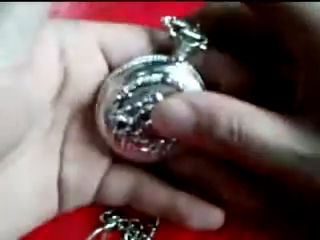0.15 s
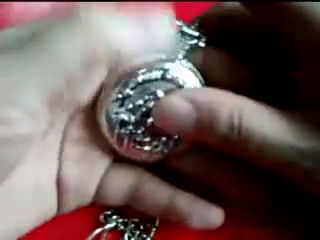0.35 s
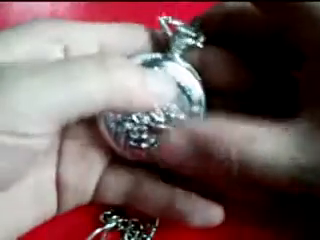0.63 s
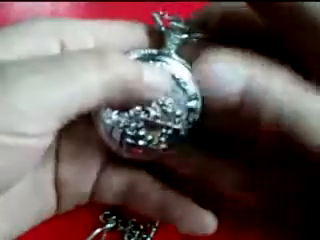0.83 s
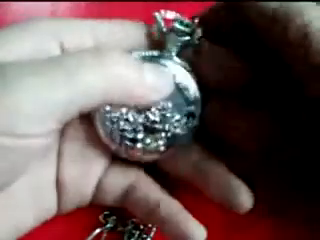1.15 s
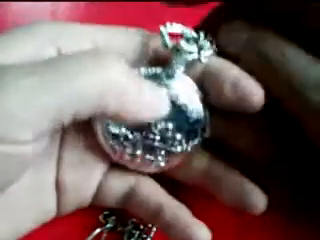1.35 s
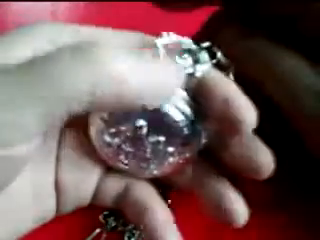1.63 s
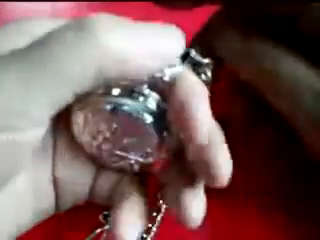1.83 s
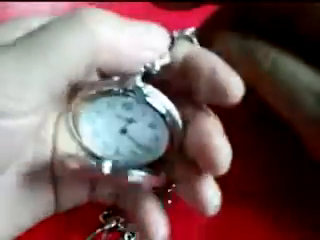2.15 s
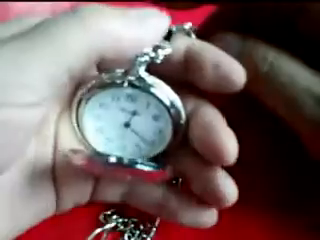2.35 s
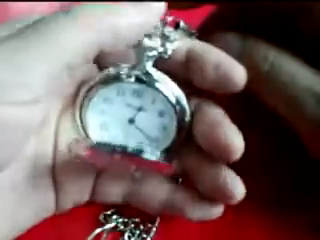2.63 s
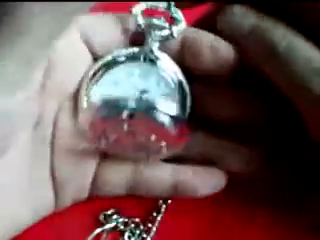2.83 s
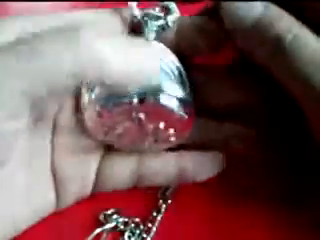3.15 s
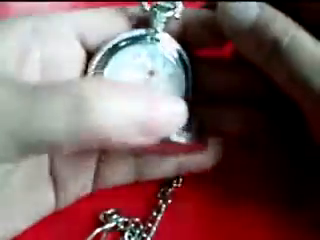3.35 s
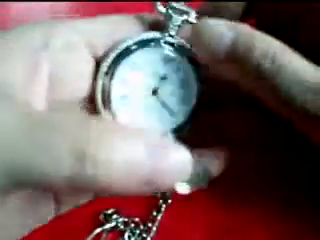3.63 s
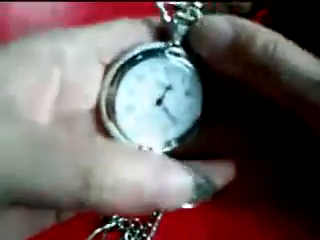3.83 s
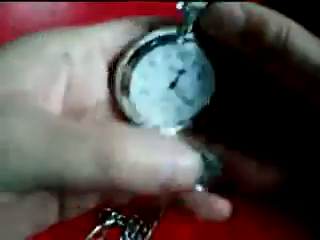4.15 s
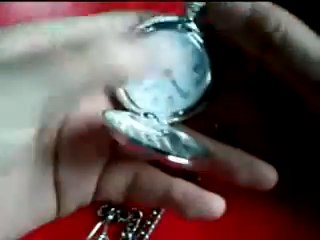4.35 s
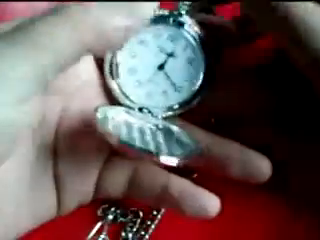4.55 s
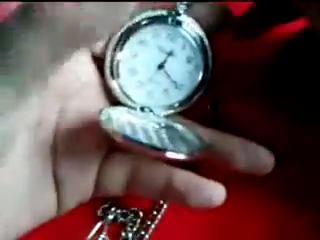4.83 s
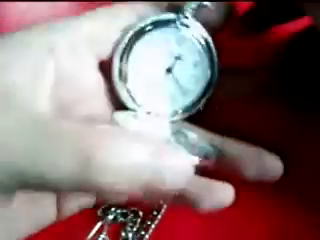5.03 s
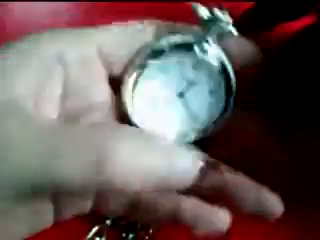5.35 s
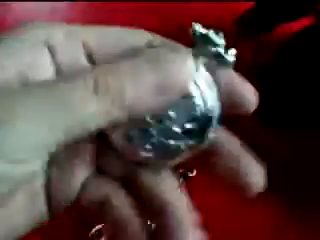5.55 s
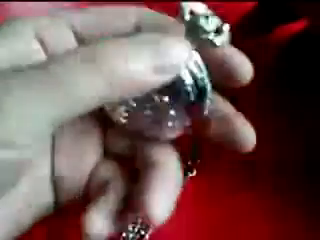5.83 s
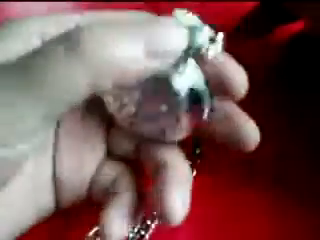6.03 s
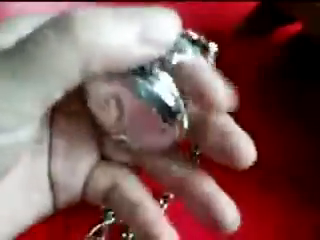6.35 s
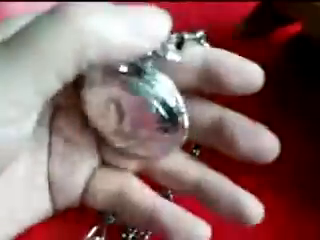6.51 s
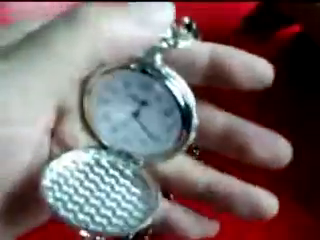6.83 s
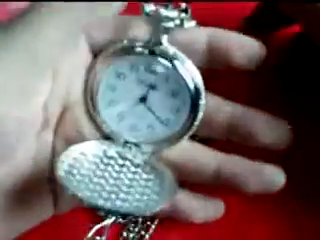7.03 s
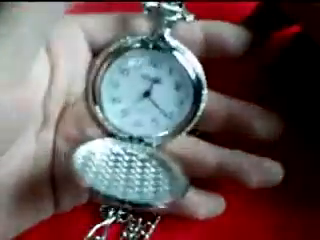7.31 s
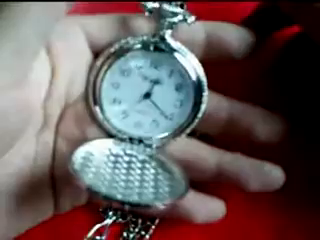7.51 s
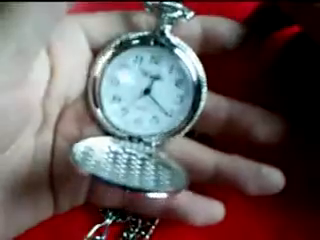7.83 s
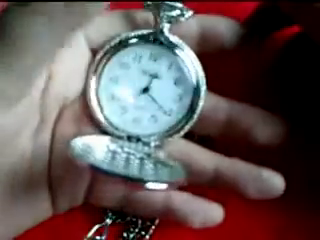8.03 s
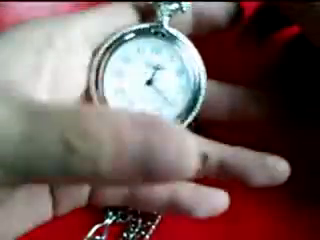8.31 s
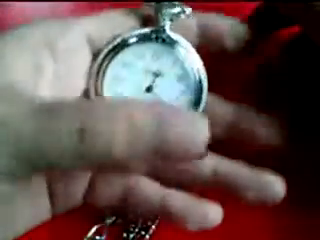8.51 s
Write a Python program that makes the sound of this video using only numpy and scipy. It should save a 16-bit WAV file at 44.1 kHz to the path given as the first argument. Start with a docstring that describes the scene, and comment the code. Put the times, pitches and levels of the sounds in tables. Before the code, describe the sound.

A metal pocket watch is handled very close to the microphone in a bare, ringing room, with faint steady hiss and low hum throughout. Two soft ticks come first. At about 1 second the cover snaps shut with a loud, sharp click that slightly overloads the microphone and leaves a short room tail. Light ticks and scrapes of bow and chain on the case gather around 2 seconds, then thin out. A bright clink at 3.7 seconds starts a busier run of clicks, scrapes and small chain rattles, strongest from 4.3 to 4.7. More ticks lead to a second loud snap at 5.8 seconds. A few clicks follow, and at about 6.7 the cover springs open, bouncing on its hinge in a quick, short chatter, with a thin high clink at 6.9. Sparse soft ticks come around 7.2 and from 8.3 to 8.6 seconds.

```python
"""A bare, ringing room, with a metal pocket watch handled close to the microphone.
Twice the cover is snapped shut past its catch, hard enough to overload the microphone. In between, bow and
chain tick and scrape on the case; after the second snap the open cover bounces on its hinge stop.
Each touch rings the hand-damped metal and carries into the room. Faint hiss and hum lie underneath."""
import sys
import numpy as np
from scipy import signal
from scipy.fft import rfft, irfft
from scipy.io import wavfile

SR = 44100
rng = np.random.default_rng(int(sys.argv[2]) if len(sys.argv) > 2 else 0)


def persist_wave(psi):
    """Save psi, clipped to +-1, as 16-bit WAV."""
    counts = np.round(np.clip(psi, -1, 1) * 32767).astype(np.int16)
    wavfile.write(sys.argv[1], SR, np.atleast_2d(counts).T)


N = 382347


def from_db(db):
    """Decibels to gain."""
    return 10 ** (np.asarray(db) / 20)


def rms_one(x):
    """Scale to rms 1."""
    return x / np.sqrt(np.mean(x ** 2) + 1e-20)


def at_hz(points, hz):
    """Read a curve on a log-frequency axis."""
    freqs, values = np.transpose(points)
    return np.interp(np.log(np.maximum(hz, 1)), np.log(freqs), values)


def seconds(length_s):
    """Time axis of the given length."""
    return np.arange(int(length_s * SR)) / SR


def add(out, start_s, sound):
    """Mix a sound in at start_s."""
    at = max(int(start_s * SR), 0)
    out[at:at + len(sound)] += sound[:N - at]


def coloured_noise(gain_at):
    """Noise of rms 1 whose spectrum follows a function of Hz."""
    spectrum = rfft(rng.standard_normal(N)) * gain_at(np.fft.rfftfreq(N, 1 / SR))
    return rms_one(irfft(spectrum, N))


# Colour of the microphone amplifier's hiss: frequency_hz, relative_db
HISS_COLOUR = [(15, -38), (25, -8.5), (89, -4.5), (118, -10.5), (140, -4), (184, -6), (289, -3), (514, -13),
               (694, -9.5), (1010, -9.5), (1750, -19.5), (2610, -28), (3520, -32.5), (7080, -36.5),
               (9800, -56), (12700, -93), (21600, -120)]

def hiss(level_db):
    """The amplifier's steady noise floor, strongest in the bass."""
    return from_db(level_db) * coloured_noise(lambda hz: from_db(at_hz(HISS_COLOUR, hz)))


# Hum and whines behind the watch: pitch_hz, half_width_hz, level_db
HUM_BANDS = [(55.3, 4.6, -62), (89, 6.1, -54.5), (311, 38, -57.5), (934, 41, -61.5), (1192, 8.9, -66.5),
             (1395, 6.8, -66), (1910, 12, -69), (2660, 16, -69), (2730, 470, -64.5)]

def hum():
    """Low hum and faint whines, each a narrow band of noise that wavers."""
    return sum(from_db(level_db) * coloured_noise(lambda hz: 1 / (1 + ((hz - pitch_hz) / width_hz) ** 2))
               for pitch_hz, width_hz, level_db in HUM_BANDS)


# Decay of the bare room: frequency_hz, t60_s
ROOM_DECAY = [(300, 2.5), (1100, 1.35), (2500, 1.8), (5000, 1.16), (9000, 1.2)]
# Colour of its tail at the microphone: frequency_hz, relative_db
TAIL_COLOUR = [(400, -20), (650, -4.5), (1150, 3.5), (1600, -0.5), (2100, 0.5), (3100, 0), (4000, -6),
               (5000, 2), (7000, -3.5), (10000, -0.5)]

def room(sound, wet_db, build_s):
    """In each band the room stores the sound's energy and lets it die away as diffuse noise."""
    out, white = np.zeros(N), rng.standard_normal((2, N))
    edges_hz = np.geomspace(400, 11000, 25)
    build = np.exp(-1 / (build_s * SR))
    for k, (low, high) in enumerate(zip(edges_hz, edges_hz[1:])):
        centre_hz = np.sqrt(low * high)
        band = signal.butter(3, [low, high], "band", fs=SR, output="sos")
        keep = from_db(-60 / (at_hz(ROOM_DECAY, centre_hz) * SR)) ** 2
        energy = signal.sosfilt(band, sound + 1e-9 * white[0]) ** 2
        arriving = signal.lfilter([1 - build], [1, -build], energy)
        stored = signal.lfilter([1 - keep], [1, -keep], arriving)
        noise = rms_one(signal.sosfilt(band, white[k % 2]))
        out += from_db(wet_db + at_hz(TAIL_COLOUR, centre_hz)) * np.sqrt(stored) * noise
    return out


# Modes of the watch's cover, case and rim, damped by the hand: pitch_hz, width_hz, relative_db
COVER_MODES = [(850, 150, -2), (1146, 180, 3), (1630, 170, 2)]
CASE_MODES = [(2000, 194, 3), (2453, 207, 4), (2640, 265, 4), (3320, 260, -3)]
RIM_MODES = [(3860, 185, -5.5), (4300, 360, 0.5), (4680, 1330, 2), (5600, 920, 1), (6670, 820, -6),
             (7250, 230, -9.5), (8000, 1500, -12), (9000, 940, -20)]

def ring(force, modes, scatter_db, favoured_hz=None, lift_db=8.5, reach_octaves=.16):
    """A force rings the metal's modes; the spot that is touched favours those around one pitch."""
    out = 0
    for k, (pitch_hz, width_hz, level_db) in enumerate(modes):
        radius = np.exp(-np.pi * width_hz / SR)
        feedback = [1, -2 * radius * np.cos(2 * np.pi * pitch_hz / SR), radius ** 2]
        mode = rms_one(signal.lfilter([1, 0, -1], feedback, force))
        if favoured_hz:
            level_db += lift_db * np.exp(-(np.log2(pitch_hz / favoured_hz) / reach_octaves) ** 2)
        out += (-1) ** k * from_db(level_db + scatter_db * rng.standard_normal()) * mode
    top_hz = 1.3 * modes[-1][0]  # little is radiated above the highest mode
    return rms_one(signal.sosfilt(signal.butter(2, top_hz, fs=SR, output="sos"), out))


def contact(parts, grit, grit_s, scatter_db, favoured_hz=None):
    """One impact with a short gritty slide rings each part, given as (modes, level_db)."""
    t = seconds(.04)
    force = (t == 0) + grit * rng.standard_normal(len(t)) * np.exp(-t / grit_s)
    ringing = sum(from_db(db) * ring(force, modes, scatter_db, favoured_hz) for modes, db in parts)
    return ringing / np.sqrt(10)  # levels count the energy as if packed into 4 ms


def tick(level_db, favoured_hz):
    """A light touch of metal on the case; cover and rim ring along more softly."""
    parts = [(CASE_MODES, level_db), (COVER_MODES, level_db - 5.5), (RIM_MODES, level_db - 15)]
    return contact(parts, grit=.096, grit_s=.0029, scatter_db=1, favoured_hz=favoured_hz)


# Metal sliding on the case, faint even this close: start_s, end_s, level_db
SLIDES = [(1.592, 1.67, -58), (1.987, 2.102, -49), (2.998, 3.08, -64), (3.33, 3.43, -58), (4.15, 4.19, -48),
          (4.263, 4.397, -42), (4.57, 4.598, -37.5), (4.574, 4.739, -46.5), (5.086, 5.224, -54.5),
          (5.638, 5.756, -45.5), (6.33, 6.386, -41.5), (6.717, 6.784, -50.5), (6.87, 6.897, -54)]

def scrapes(slips_per_s, spread_db):
    """Sliding metal sticks and slips: dense uneven clicks drive case and rim."""
    out = np.zeros(N)
    slipping = rng.random(N) < slips_per_s / SR
    slips = slipping * rng.standard_normal(N) * from_db(spread_db * rng.standard_normal(N)) + 1e-12
    for start_s, end_s, level_db in SLIDES:
        force = slips[int(start_s * SR):int(end_s * SR)]
        force = force * signal.windows.tukey(len(force), .5)
        case = ring(force, CASE_MODES, scatter_db=1)
        rim = from_db(-13) * ring(force, RIM_MODES, scatter_db=4)
        add(out, start_s, from_db(level_db) * (case + rim))
    return out


def chain_jostle(touches_per_s, reach_s, level_db, spread_db):
    """Around each slide, a few loose chain links touch the case at random."""
    out = np.zeros(N)
    for start_s, end_s, _ in SLIDES:
        first_s, span_s = start_s - reach_s, end_s - start_s + 2 * reach_s
        for when, strength, spot in rng.random((round(touches_per_s * span_s), 3)):
            favoured_hz = CASE_MODES[int(spot * len(CASE_MODES))][0]
            touch_db = level_db + spread_db * (2 * strength - 1)
            add(out, first_s + when * span_s, tick(touch_db, favoured_hz))
    return out


# Small knocks on the case, close to the microphone: start_s, level_db, favoured_hz
CASE_TICKS = [(0.0358, -48.5, 2670), (0.3454, -44, 2620), (1.5448, -45, 2280), (1.9683, -35.5, 2220),
              (2, -38.5, 2360), (2.031, -39, 2460), (2.0383, -40, 2510), (2.234, -30, 2680),
              (2.8589, -48.5, 1980), (3.863, -45.5, 2000), (4.0102, -33.5, 2300), (4.2778, -29, 2350),
              (4.2834, -29, 2450), (4.294, -32, 2290), (4.3653, -28.5, 1970), (4.4308, -42, 2470),
              (4.5576, -34, 1970), (4.5791, -22, 2190), (4.6806, -29.5, 2120), (4.802, -39.5, 2060),
              (5.3078, -41.5, 2060), (5.4323, -39, 2000), (5.6553, -37.5, 1960), (5.707, -31, 1950),
              (5.728, -32.5, 1950), (6.0943, -28, 1820), (6.115, -33, 2020), (6.343, -35.5, 2300),
              (6.7377, -34.5, 2450), (6.8006, -43, 1960), (7.0086, -41, 2590), (7.204, -42.5, 2330),
              (8.298, -47, 2670), (8.4253, -43.5, 1830), (8.5913, -46, 2000)]

def ticks():
    """Bow and crown knock on the case as the watch is turned in the hand."""
    out = np.zeros(N)
    for start_s, level_db, favoured_hz in CASE_TICKS:
        add(out, start_s, tick(level_db, favoured_hz))
    return out


# Hinge and chain clinking on the rim: start_s, level_db, pitch_hz
RIM_CLINKS = [(3.7273, -31.5, 4080), (3.79, -48.5, 4100), (3.9675, -47, 5600), (4.0693, -43, 5600),
              (4.577, -40, 4300), (4.6825, -44.5, 5600), (5.0968, -53, 5600), (6.721, -44.5, 4300),
              (6.9007, -34, 7150)]

def clinks(tone_t60_s):
    """Bright touches on the rim, where the hand does not damp it: a thin tone rings on."""
    out, t = np.zeros(N), seconds(.5)
    for start_s, level_db, pitch_hz in RIM_CLINKS:
        parts = [(RIM_MODES, level_db), (CASE_MODES, level_db - 5.5), (COVER_MODES, level_db - 7)]
        add(out, start_s, contact(parts, grit=.17, grit_s=.0026, scatter_db=3.5, favoured_hz=pitch_hz))
        fade = from_db(level_db - 33 - 60 * t / tone_t60_s)
        add(out, start_s, fade * np.sin(2 * np.pi * pitch_hz * t))
    return out


# Modes of the open cover against its hinge stop: pitch_hz, width_hz, relative_db
HINGE_MODES = [(980, 164, 2), (1106, 120, 1), (1950, 250, -22), (3900, 600, -39)]

def cover_bounces(start_s, count, gap_s=.0357, gap_kept=.72, first_db=-26.5, loss_db=2.5, chatter_db=-36):
    """The sprung cover knocks on its stop, sooner and softer, and ends in an even chatter."""
    out = np.zeros(N)
    for k in range(count):
        level_db = max(first_db - loss_db * k, chatter_db)
        add(out, start_s, contact([(HINGE_MODES, level_db)], grit=.048, grit_s=.0016, scatter_db=1))
        start_s += gap_s * gap_kept ** k
    return out


# The dull thump under a snap: pitch_hz, width_hz, relative_db
THUMP_MODES = [(134, 1250, 0.082), (326, 1600, -1.1)]
# The cover rides up the catch, the catch springs over, the rims meet, the cover seats.
# Levels are relative to the snap's: delay_s, cover_db, case_db, rim_db, thump_db
CLOSING_STAGES = [(0, -18.5, -28, -22.5, -2), (.0017, 0, -4, -6.5, -7), (.0028, -16.5, -12.5, -2, -8),
                  (.0037, -3.5, -20.5, -8, 7.5)]
# The cover shutting right by the microphone: start_s, cover_db, case_db, rim_db, thump_db, cover_hz
COVER_SNAPS = [(1.0067, -9, -10, -16.5, -30, 1460), (5.786, -11, -11.5, -10.5, -42, 1080)]

def cover_snaps(catch_hz, rims_hz):
    """The cover is forced past the catch: four clean, hard impacts within milliseconds."""
    out = np.zeros(N)
    for start_s, *levels_db, cover_hz in COVER_SNAPS:
        favoured_hz = (cover_hz, catch_hz, rims_hz, cover_hz)
        for (delay_s, *shares_db), hz in zip(CLOSING_STAGES, favoured_hz):
            parts = zip((COVER_MODES, CASE_MODES, RIM_MODES, THUMP_MODES), np.add(levels_db, shares_db))
            impact = contact(parts, grit=.02, grit_s=.001, scatter_db=.5, favoured_hz=hz)
            add(out, start_s + delay_s, impact)
    return out


def scene():
    """The watch close up, with the room's tail and the hum behind it, in mono."""
    watch = cover_snaps(catch_hz=2930, rims_hz=3920) + ticks() + clinks(tone_t60_s=.35)
    watch += cover_bounces(start_s=6.6603, count=7)
    watch += scrapes(slips_per_s=2500, spread_db=3.5)
    watch += chain_jostle(touches_per_s=11, reach_s=.06, level_db=-49.5, spread_db=3)
    return (watch + room(watch, wet_db=-12.5, build_s=.0022) + hum())[None]


def record(dry):
    """The snaps overload the microphone; its amplifier dulls the treble and adds hiss and a whine."""
    ceiling, treble_edge_hz, whine_hz, stopband_hz = .68, 8000, 11025, 11663
    clipped = dry / (1 + (dry / ceiling) ** 4) ** (1 / 4)
    dulled = signal.sosfilt(signal.butter(4, treble_edge_hz, fs=SR, output="sos"), clipped)
    whine = from_db(-88.5) * np.sin(2 * np.pi * whine_hz * np.arange(N) / SR)
    top_cut = signal.cheby2(14, 50, stopband_hz, fs=SR, output="sos")
    return signal.sosfilt(top_cut, dulled + hiss(level_db=-45) + whine)


dry = scene()
out = record(dry)
persist_wave(out)
```